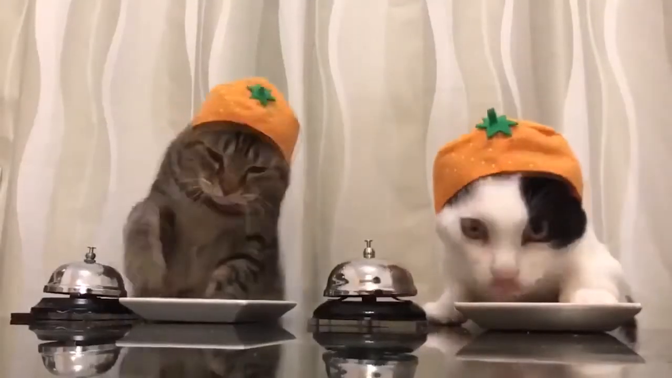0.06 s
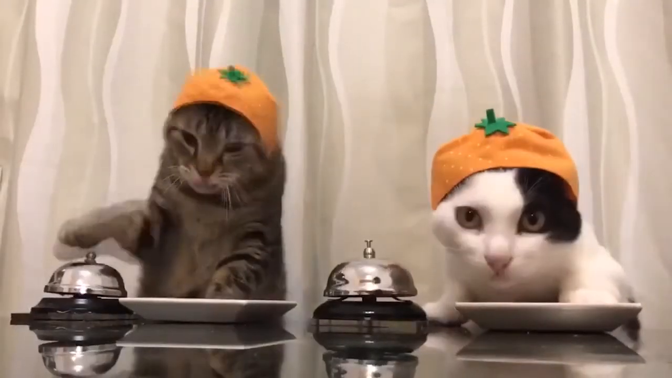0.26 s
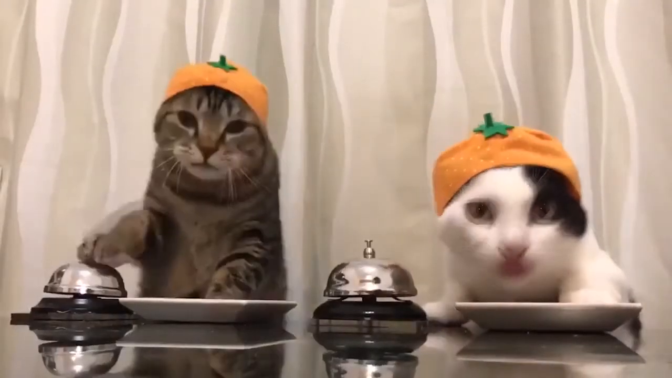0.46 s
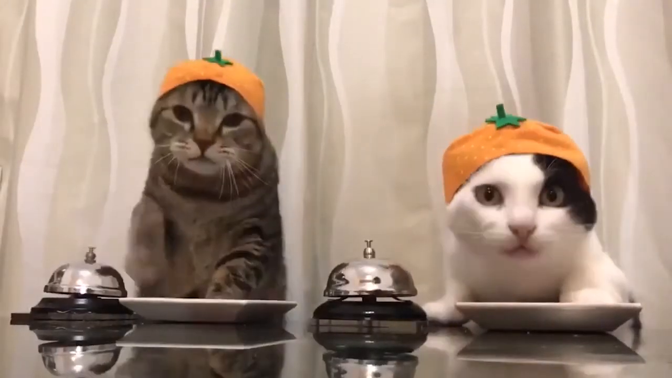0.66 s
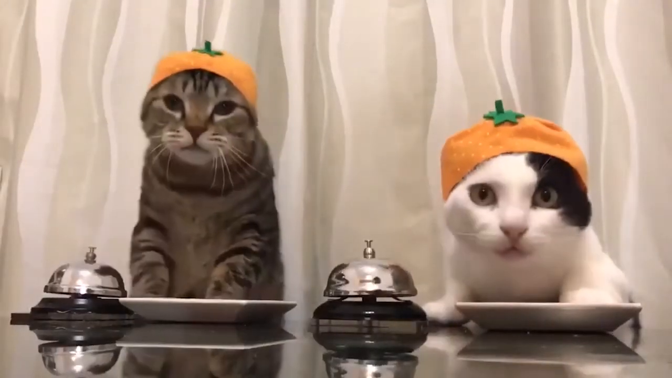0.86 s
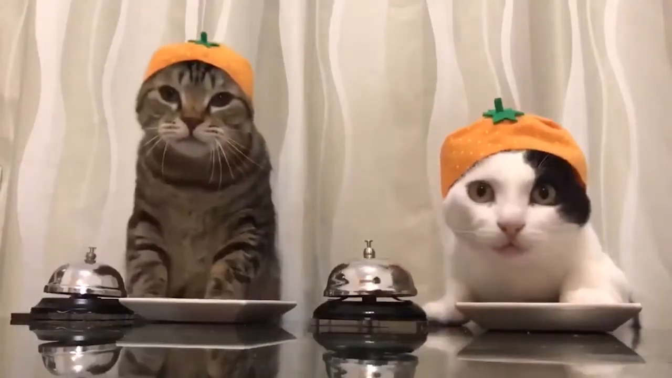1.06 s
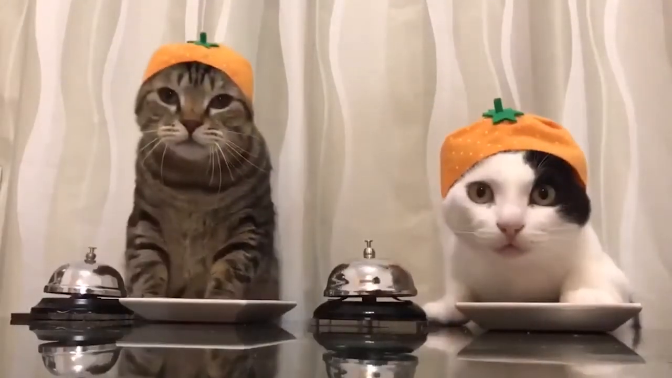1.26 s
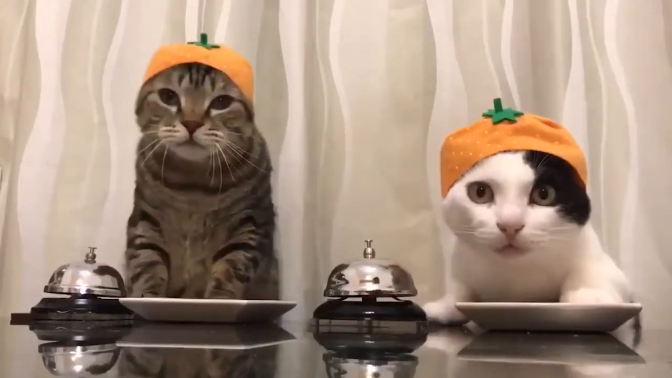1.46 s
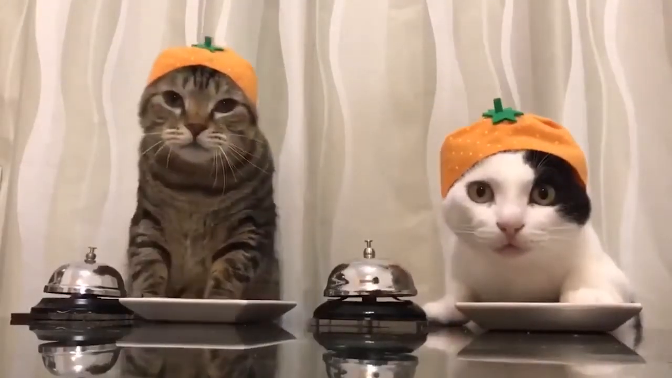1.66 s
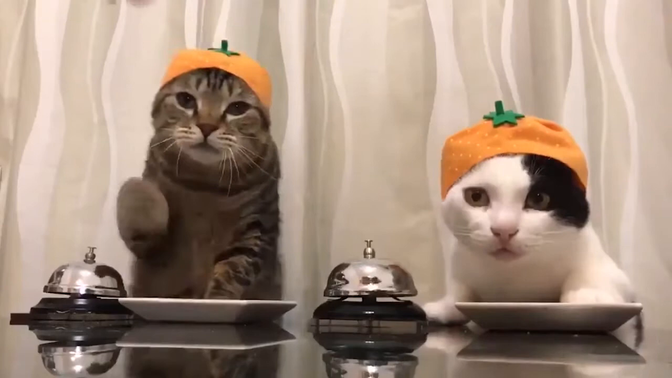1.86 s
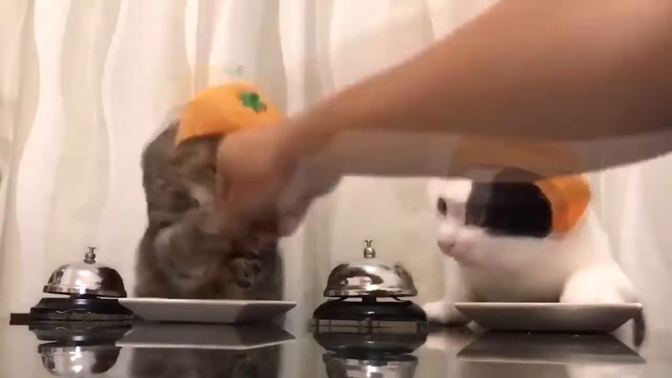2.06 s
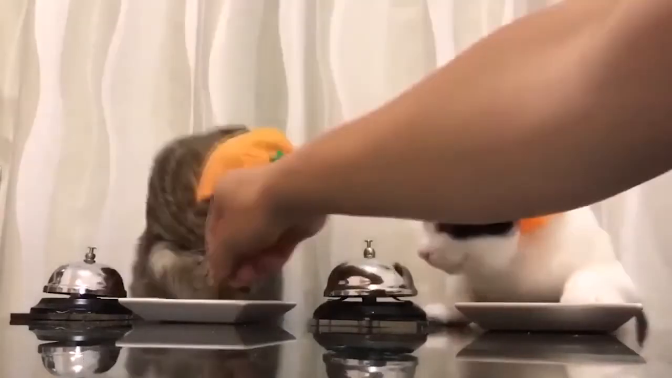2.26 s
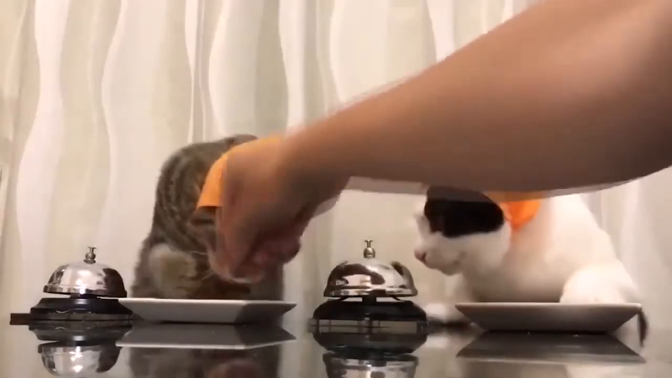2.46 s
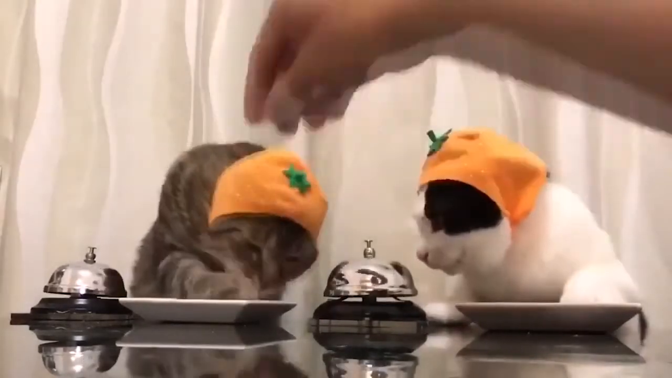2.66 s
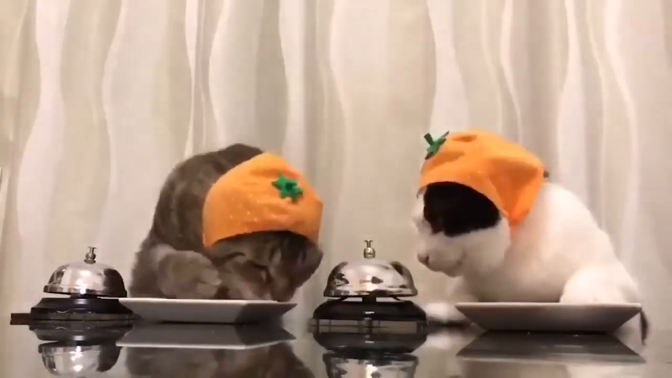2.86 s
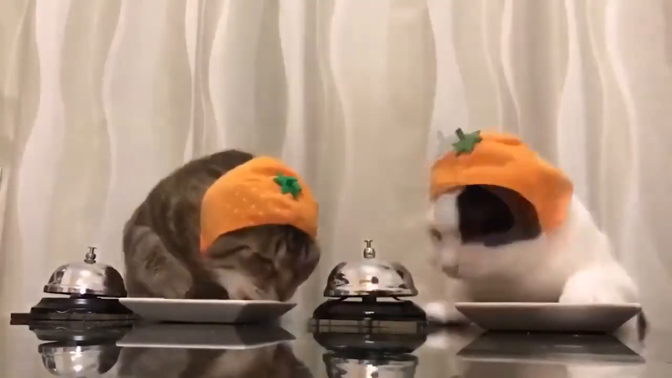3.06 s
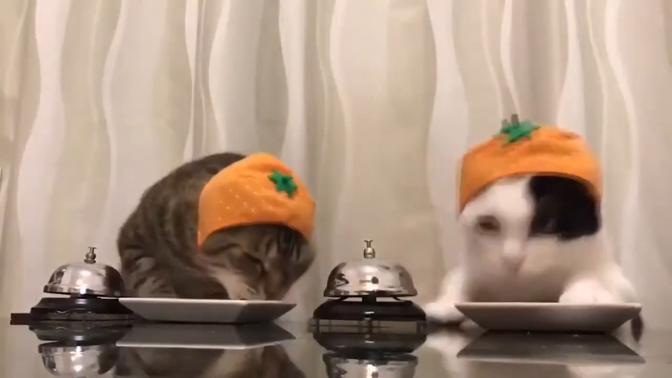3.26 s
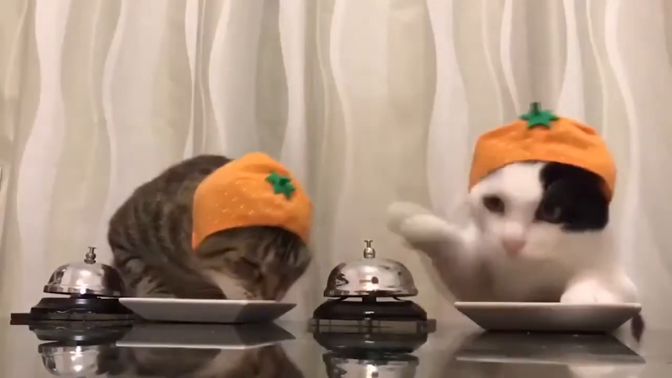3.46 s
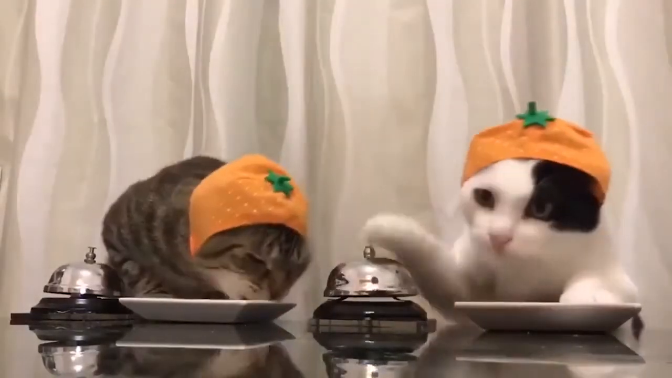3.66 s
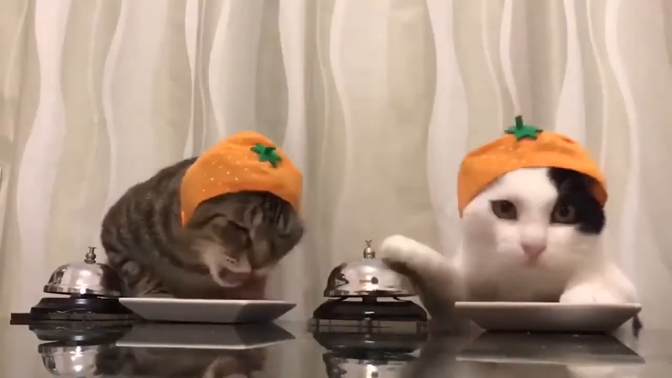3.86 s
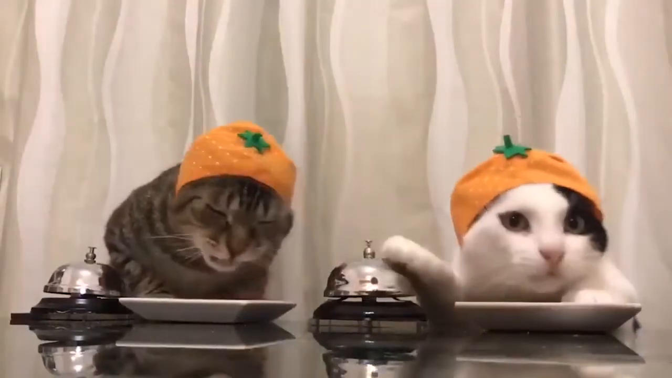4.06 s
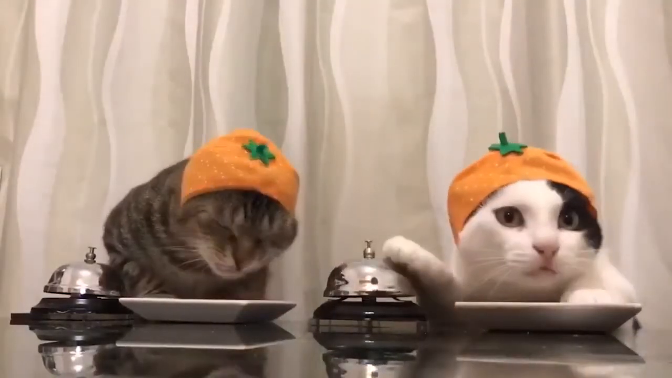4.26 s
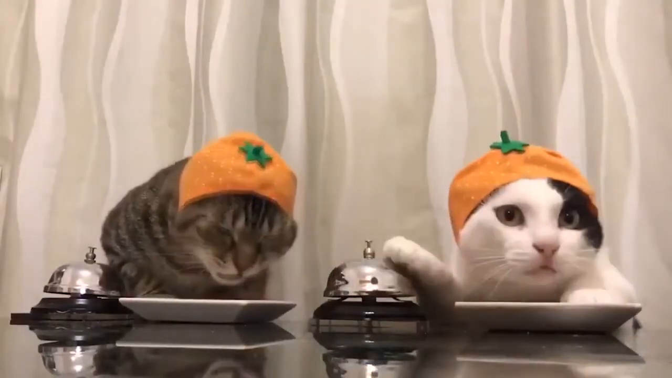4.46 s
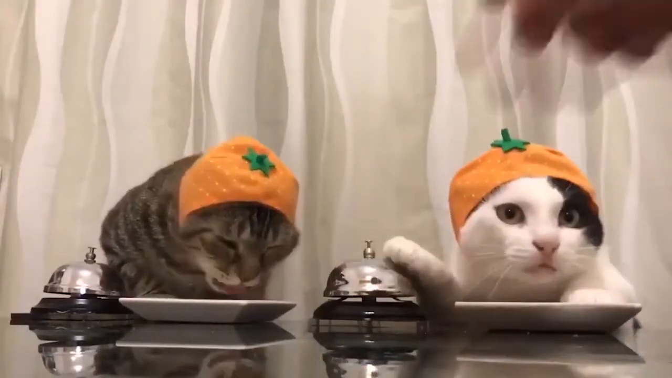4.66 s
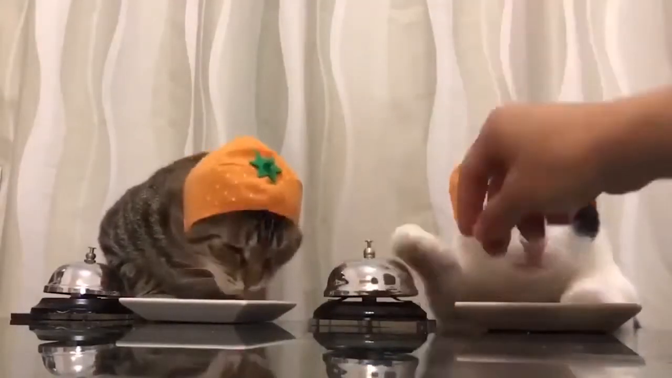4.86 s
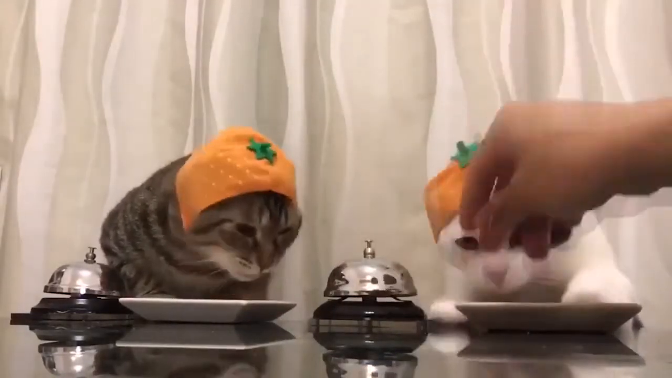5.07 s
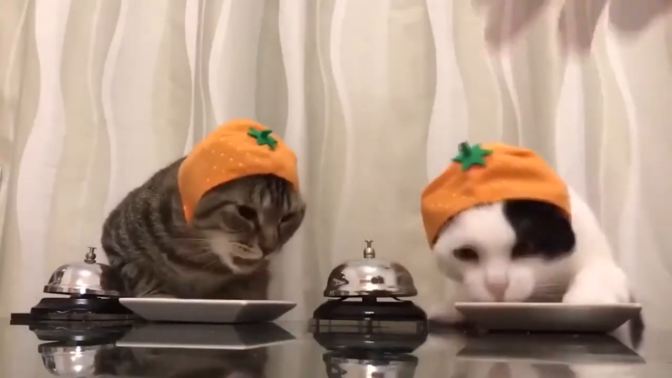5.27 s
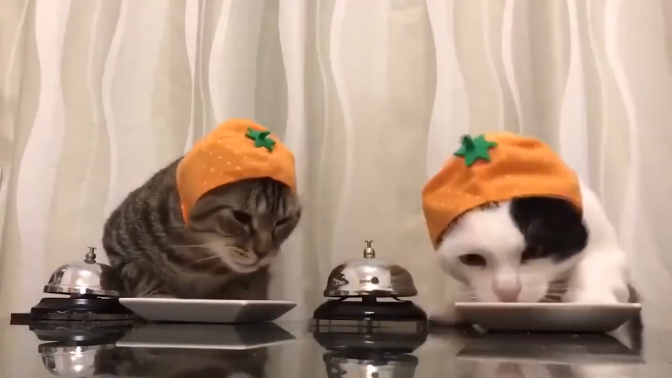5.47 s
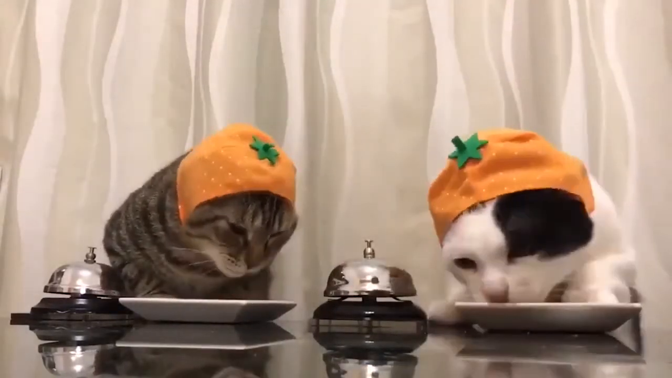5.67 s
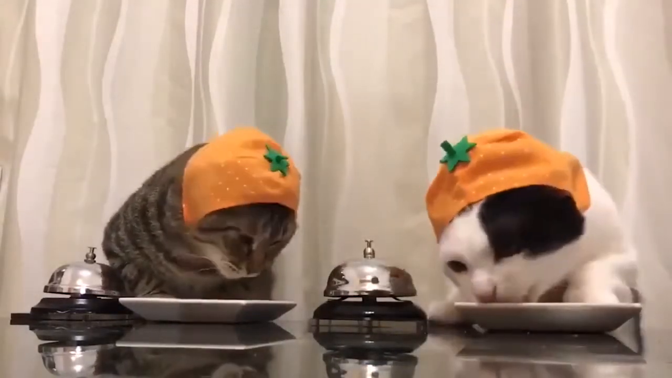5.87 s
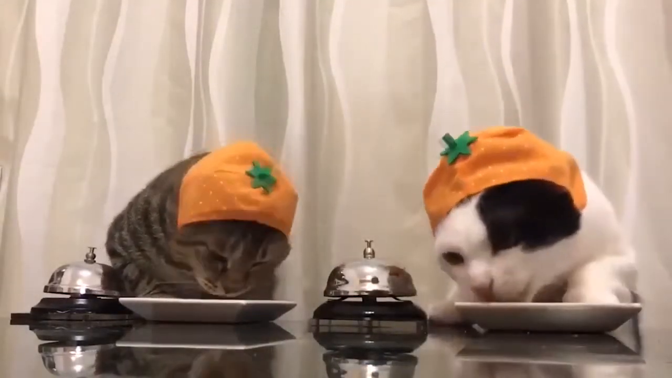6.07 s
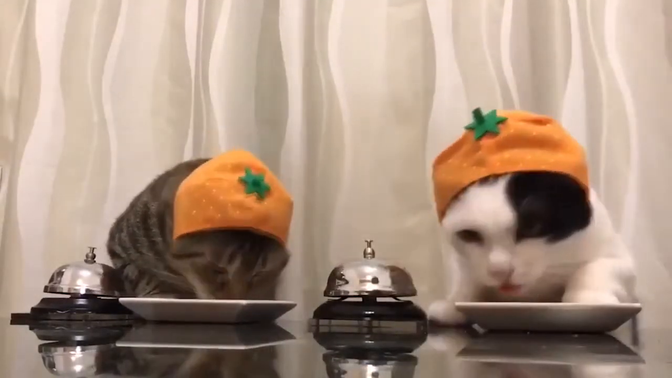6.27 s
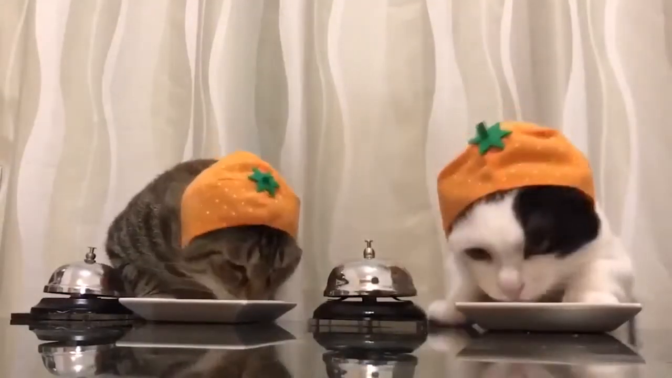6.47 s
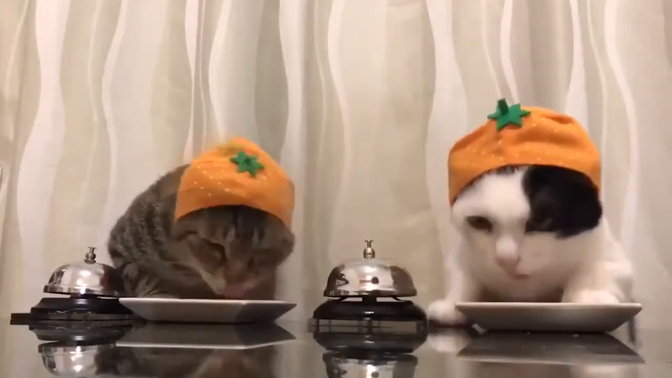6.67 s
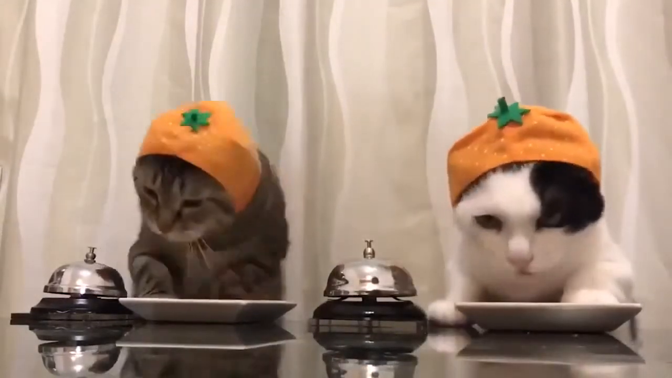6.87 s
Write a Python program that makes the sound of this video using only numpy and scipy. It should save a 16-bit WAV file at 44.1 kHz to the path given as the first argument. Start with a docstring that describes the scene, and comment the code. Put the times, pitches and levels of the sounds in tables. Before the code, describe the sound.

In a quiet room, a cat's paw rattles the plunger of a metal desk bell, then strikes a bright ding that rings on for seconds. Dry food ticks onto a plate between small wet smacks. A second cat hits another bell, which clinks, chatters and rings, then fades under soft chewing and a few more ticks. Everything is heard on the right side, over faint hiss.

```python
"""Two cats ring two steel desk bells on a glass table in a quiet living room and eat dry food from plates.
A paw rattles the first plunger; at 0.6 s the clapper bounces on the bell, each contact restarting its
modes at new strengths, and split pairs beat through the long ring. From 2.6 s food ticks on a plate
between wet smacks. Near 3.9 s the second bell clinks, chatters and rings, then fades under the chewing.
It all plays on the right channel; the left is all but silent, with very faint hiss."""
import sys
import numpy as np
from scipy import signal
from scipy.fft import rfft, irfft, next_fast_len
from scipy.io import wavfile

SR = 44100
rng = np.random.default_rng(int(sys.argv[2]) if len(sys.argv) > 2 else 0)


def master_out(mix):
    """Clip the mix to full scale and print it as 16-bit PCM to the path in sys.argv[1]."""
    frames = np.transpose(np.atleast_2d(mix))
    ceiling = np.clip(frames, -1, 1)
    pcm = np.round(ceiling * 32767).astype(np.int16)
    wavfile.write(sys.argv[1], SR, pcm)


N = 305613
T = np.arange(N) / SR


def amp(db):
    """Decibels to amplitude."""
    return 10 ** (np.asarray(db) / 20)


def add(out, s, piece):
    """Mix a short sound in at s seconds."""
    part = out[round(s * SR):round(s * SR) + len(piece)]
    part += piece[:len(part)]


def dull(x, top_hz):
    """Roll off the top with a second-order low-pass."""
    return signal.lfilter(*signal.butter(2, min(top_hz, 18000), fs=SR), x)


def coloured(x, spectrum):
    """EQ through points of (Hz, dB); white noise keeps its loudness."""
    size = next_fast_len(len(x))
    hz = np.maximum(np.arange(size // 2 + 1) * SR / size, 1)
    point_hz, point_db = np.transpose(spectrum)
    gain = amp(np.interp(np.log(hz), np.log(point_hz), point_db))
    return irfft(rfft(x, size) * gain / np.sqrt(np.mean(gain ** 2)), size)[:len(x)]


def resonate(x, hz, width_hz):
    """Two-pole resonance with unity gain at its peak."""
    r = np.exp(-np.pi * width_hz / SR)
    gain = (1 - r * r) / 2
    return signal.lfilter([gain, 0, -gain], [1, -2 * r * np.cos(2 * np.pi * hz / SR), r * r], x + 1e-18)


def steep_band(x, hz, width_hz):
    """The same resonance twice over, for steeper skirts."""
    return resonate(resonate(x, hz, width_hz), hz, width_hz)


def puff(db, t60, rise=0.00025):
    """A burst of white noise that rises quickly and dies away."""
    age = np.arange(SR // 2) / SR
    envelope = amp(db - 60 * age / t60) * (1 - np.exp(-age / rise))
    return envelope * rng.standard_normal(len(age)) + 1e-18


def ping(hz, db, t60):
    """One briefly ringing mode: a decaying sine."""
    age = np.arange(SR // 4) / SR
    return amp(db - 60 * age / t60) * np.sin(2 * np.pi * hz * age)


def hiss_and_wash():
    """Steady room hiss, plus a broad wash of noise around each bell crash."""
    # Each row: frequency in Hz, noise density in dB.
    hiss_colour = [(12, -34.5), (20, -13.5), (65, 3.5), (162, -10), (345, -13), (419, -19), (916, -16.5),
                   (1050, -19.5), (1150, -13.5), (1280, -18.5), (3040, -33), (5320, -34.5), (9830, -40.5),
                   (13700, -41.5), (15800, -50)]
    # Each row: crest time in seconds, lift in dB.
    washes = [(0.641, 13.5), (3.85, 9)]
    rise_s, fall_s = 0.1, 0.18
    wash_db = sum(db * np.exp(np.minimum((T - s) / rise_s, (s - T) / fall_s)) for s, db in washes)
    return amp(-62.5 + wash_db) * coloured(rng.standard_normal(N), hiss_colour)


def low_tone():
    """A faint low tone comes in, sags in level and goes."""
    hz, start_s, length_s, fade_s, sag_db_per_s = 245.4, 4.53, 0.684, 0.066, 17
    age = T - start_s
    fades = np.clip(np.minimum(age, length_s - age) / fade_s, 0, 1)
    return fades * amp(-64 - sag_db_per_s * age) * np.sin(2 * np.pi * hz * T)


def room_tail(x):
    """The room's diffuse reverb: dull, decaying noise after a short pre-delay."""
    t60, predelay_s = 0.4, 0.004
    age = np.arange(SR // 2) / SR
    tail = dull(rng.standard_normal(len(age)), top_hz=4500) * amp(-60 * age / t60) * (age > predelay_s)
    return amp(-11.5) * signal.fftconvolve(x, tail / np.sqrt(np.sum(tail ** 2)))[:N]


def scuffs():
    """Fur or tongue brushes by: a high band of noise with a soft attack."""
    # Each row: start in seconds, level in dB, centre in Hz, width in Hz.
    strokes = [(2.27, -64, 5980, 5010), (3.775, -45, 8900, 3000), (4.99, -54.5, 5820, 6000),
               (5.27, -49, 9500, 2945), (5.501, -48, 6000, 6000), (5.795, -49, 4500, 1503),
               (5.8, -52, 11070, 4970), (6.646, -37.5, 8760, 1236), (6.82, -60, 10000, 6000)]
    out = np.zeros(N)
    for s, db, hz, width in strokes:
        add(out, s, steep_band(puff(db, t60=0.16, rise=0.027), hz, width))
    return out


def mouth_smacks():
    """Licks, crunches and chews: wet clicks through a steep mouth resonance, over a duller cavity."""
    # Each row: start in seconds, click level in dB, mouth resonance in Hz, body level in dB.
    smacks = [(0.2839, -49.5, 1820, -53), (0.2937, -51.5, 1498, -44.5), (0.35, -53, 2210, -70),
              (0.3631, -57.5, 1900, -71), (1.9839, -50.5, 1330, -49.5), (2.826, -37, 1620, -41),
              (3.27, -56.5, 1436, -68), (3.3822, -51.5, 2136, -57.5), (3.6032, -49, 1668, -42.5),
              (4.147, -46.5, 1900, -65), (4.196, -41.5, 2050, -62.5), (4.455, -44, 1930, -64),
              (4.6299, -54, 2070, -78), (4.798, -52, 1310, -74), (4.8883, -54, 2250, -65),
              (4.9926, -48.5, 1585, -40), (5.2056, -47.5, 2084, -51), (5.477, -59, 2370, -54),
              (5.5049, -40, 1710, -44), (6.6912, -48.5, 1740, -47)]
    # Faint chews fall at random in between.
    draws = rng.uniform(low=(4.3, -67.5, 1300), high=(6.1, -57.5, 2100), size=(14, 3))
    chews = [(s, db, hz, db - 9) for s, db, hz in draws]
    out, t60 = np.zeros(N), 0.054
    for s, db, hz, body_db in smacks + chews:
        add(out, s, amp(13) * steep_band(puff(db, t60), hz, width_hz=820))
        add(out, s, amp(13.5) * steep_band(puff(body_db, t60, rise=0.0028), hz=700, width_hz=1000))
    return out


def food_ticks():
    """Dry food hits a plate with a short crack, ringing each mode at a strength of its own."""
    # Each row: start in seconds, ring level in dB, crack level in dB.
    hits = [(2.5974, -41.5, -32.5), (2.6925, -60, -56), (2.7354, -60, -53.5), (2.7691, -50, -51),
            (2.9208, -60.5, -61), (2.9717, -69, -43.5), (3.3109, -77, -57), (3.4053, -56.5, -43.5),
            (3.51, -49.5, -49), (3.522, -50, -42), (3.6264, -52.5, -48), (3.6429, -44, -39.5),
            (3.7969, -52.5, -52.5), (5.214, -78.5, -48.5), (5.2841, -43.5, -39), (5.8162, -68, -52),
            (6.6621, -71, -47), (6.8293, -70, -54)]
    # The plates' modes. Each row: pitch in Hz, level in dB, t60 in seconds.
    first_plate = [(392, -4.5, 0.086), (825, -2.5, 0.033), (3100, -1, 0.055), (4776, 3, 0.042),
                   (7700, -32.5, .05), (7530, -7, 0.058), (10700, -37.5, 0.028)]
    second_plate = [(1374, -10.5, 0.13), (2900, 2.5, 0.12), (4410, 0, 0.033), (6000, -17, 0.054),
                    (7640, -2.5, 0.052), (9000, -23, 0.065), (9300, -8.5, 0.049)]
    second_meal_s, crack_top_hz = 4.9, 7850
    scatter_db = rng.normal(0, 3, (len(hits), len(first_plate)))
    out = np.zeros(N)
    for (s, ring_db, crack_db), offsets_db in zip(hits, scatter_db):
        plate = first_plate if s < second_meal_s else second_plate
        for (hz, mode_db, t60), offset_db in zip(plate, offsets_db):
            add(out, s, ping(hz, ring_db + mode_db + offset_db, t60))
        crack = puff(crack_db, t60=0.034)
        add(out, s, dull(dull(crack, crack_top_hz), crack_top_hz))
    return out


def plunger_rattles():
    """Plunger and spring rattle under the paw, whose weight thumps into the table."""
    # Each row: start in seconds, level in dB, t60 in seconds, low-pass cutoff in Hz.
    rattles = [(0.444, -42, 0.14, 14960), (0.527, -35.5, 0.11, 15200), (0.537, -41, 0.043, 15000),
               (0.608, -35, 0.18, 12000), (0.634, -30.5, 0.22, 2500), (0.822, -34, 0.1, 5000),
               (0.841, -33.5, 0.12, 5200), (0.912, -36.5, .075, 2440), (1.021, -39.5, 0.15, 1800),
               (4.11, -36, 0.1, 5970), (3.846, -44, .05, 12200), (4.435, -45, 0.1, 3940),
               (4.457, -45.5, 0.1, 14000)]
    # Each row: centre in Hz, width in Hz, gain in dB.
    plunger_resonances = [(1424, 280, 0.5), (4100, 150, -4), (4310, 70, 3), (6440, 121, -10),
                          (6792, 510, -8), (8310, 710, -9), (8920, 190, -0.5), (11057, 354, -16),
                          (12200, 122, -11), (12800, 104, -12), (13000, 183, -9.5), (13796, 232, -11.5)]
    # Each row: start in seconds, level in dB.
    paw_thumps = [(0.447, -56), (0.463, -39.5), (0.49, -44), (0.539, -49), (0.633, -46.5), (3.845, -60),
                  (4.111, -54.5)]
    noise, push = np.zeros(N), np.zeros(N)
    pulse = np.hanning(110)   # the weight lands within 2.5 ms
    for s, db, t60, top_hz in rattles:
        add(noise, s, dull(puff(db, t60), top_hz))
        add(push, s, amp(db - 22.5) * pulse)   # every rattle nudges the table
    for s, db in paw_thumps:
        add(push, s, amp(db) * pulse)
    metal = sum(amp(db) * resonate(noise, hz, width) for hz, width, db in plunger_resonances)
    table = (amp(18) * resonate(push, hz=100, width_hz=30)
             + amp(9.5) * resonate(push, hz=210, width_hz=54)
             + amp(7.5) * resonate(push, hz=520.5, width_hz=200))
    return amp(6) * metal + amp(-8) * noise + table


def first_crash():
    """The clapper hits the first bell's steel in bright splashes of noise."""
    # Each row: start in seconds, level in dB, t60 in seconds.
    hits = [(0.627, -30.5, 0.017), (0.631, -13, 0.067), (0.641, -20, 0.18), (0.812, -41, 0.17),
            (0.841, -43, 0.24)]
    # Each row: frequency in Hz, noise density in dB.
    steel_colour = [(180, -70), (300, -40.5), (1350, -22.5), (2560, -34.5), (3020, -15), (4650, -36),
                    (5570, -3.5), (6050, -18), (7500, -26), (8840, -1.5), (9600, -11), (13600, -22),
                    (15500, -37.5)]
    noise = np.zeros(N)
    for s, db, t60 in hits:
        add(noise, s, puff(db, t60))
    return coloured(noise, steel_colour)


def second_crash():
    """The second bell's plunger clinks as the paw lands; the clapper chatters and loose parts clank."""
    # Each row: start in seconds, level in dB, t60 in seconds.
    hits = [(3.864, -24, .06), (3.87, -26.5, .06), (3.882, -26.5, .08), (3.9, -28.5, .09),
            (3.951, -31.5, 0.092), (3.979, -32, 0.083), (4.112, -39.5, .06)]
    # Each row: frequency in Hz, noise density in dB.
    steel_colour = [(300, -9.5), (1500, -8.5), (2400, -15), (3400, 6), (4300, -3), (4800, -20),
                    (6000, -2.5), (7000, -16.5), (9500, -20.5), (11000, -3), (13000, 2.5), (15500, -11.5)]
    # Each row: centre in Hz, width in Hz, gain in dB.
    loose_parts = [(3350, 110, 8.5), (4030, 50, 11), (4310, 60, 16), (4690, 70, 9.5), (7000, 150, 3),
                   (9560, 150, -1.5), (10500, 140, 11)]
    # Each row: pitch in Hz, level in dB, t60 in seconds.
    clink_modes = [(3400, -7, 0.051), (4690, 0.8, .06), (9500, -8, .06)]
    noise, clink = np.zeros(N), np.zeros(N)
    add(clink, 3.846, sum(ping(hz, db - 30, t60) for hz, db, t60 in clink_modes))
    for s, db, t60 in hits:
        add(noise, s, puff(db, t60, rise=0.0021))
    touches_per_s, rub_db = 2500, -7
    touches = (rng.random(N) < touches_per_s / SR) * np.sqrt(SR / touches_per_s)
    chatter = noise * (touches + amp(rub_db))
    clank = sum(amp(db) * resonate(chatter, hz, width) for hz, width, db in loose_parts)
    return clink + amp(-4.5) * coloured(chatter, steel_colour) + clank


def bell_mode(onsets, damping, hz, mode_db, t60):
    """A decaying sine; each onset whose range covers it crossfades to a fresh ring."""
    # Upper twins of split pairs and side modes, in Hz; their share depends on where the rim is met.
    rim_family_hz = [1162.2, 3043.4, 5640, 10600, 13190, 2864.9, 8693.2, 10444.4, 11996.7, 12795.6, 13015.6]
    # Twins that start in opposite phase, in Hz.
    opposed_hz = [5640, 2864.9]
    sign = -1 if hz in opposed_hz else 1
    accent_octaves = 0.36
    out, decay_clock = np.zeros(N), np.cumsum(damping) / SR
    # Each row: start and rise in seconds, bottom and top of the restarted range in Hz, strength in dB,
    # centre of a boosted or muffled band in Hz, its gain in dB, gain of the rim family in dB.
    for s, rise, low_hz, high_hz, db, accent_hz, accent_db, rim_db in onsets:
        if low_hz < hz < high_hz:
            nearness = np.exp(-.5 * (np.log2(hz / accent_hz) / accent_octaves) ** 2)
            level_db = mode_db + db + accent_db * nearness + rim_db * (hz in rim_family_hz)
            start = round(s * SR)
            age = T[start:] - T[start]
            decay_db = 60 * (decay_clock[start:] - decay_clock[start]) / t60
            fresh = sign * amp(level_db - decay_db) * np.sin(2 * np.pi * hz * age)
            fade_out = np.exp(-age / rise)
            out[start:] = fade_out * out[start:] + (1 - fade_out) * fresh
    return out


def first_bell():
    """The first steel dome rings long after the clapper's bounces, its level wavering slowly."""
    # A faint hum still ringing at the start, then the clapper's contacts; rows as in bell_mode.
    onsets = [(0.0, 0.013, 500, 1400, -41, 6500, 0.1, 18),
              (0.631, 0.0002, 500, 17000, -7.5, 6850, 17.5, 8.5),
              (0.643, 0.0025, 500, 17000, -8, 7030, 15, 11),
              (0.812, 0.012, 500, 17000, -0.24, 7000, 0, 0.1)]
    # Mode pitches in Hz.
    pitches = [1123.2, 1162.2, 1710.4, 3020.2, 3043.4, 4886, 5610.4, 5640, 6920, 8785.5, 9510.4, 10600,
               12685.6, 13190, 13410.5]
    # Each row, one per pitch: level in dB, t60 in seconds.
    modes = [(-42.5, 14.54), (-50, 13), (-70.5, 16), (-21, 5.35), (-35, 5.9), (-44.5, 0.55), (-20.5, 2.167),
             (-28.5, 2), (-69.5, 9.8), (-13, 0.58), (-52, 2.1), (-77, 8.4), (-39, .6), (-43, 0.33),
             (-67.5, 1.9)]
    # Each row: time in seconds, gain of the hum modes in dB, gain of the upper modes in dB.
    waver = [(0.8, -0.5, -1.5), (1.3, 2, 0), (1.9, 3, -1.5), (2.2, 4, -2), (2.7, 7.5, -6.5), (3.0, 1, -5),
             (3.7, 5, -0.5), (4.0, -0.5, -5), (4.4, 4, -1.5), (4.9, 5, -1), (5.3, 3.5, -7),
             (5.8, 3.5, -1.5), (6.3, 2.5, -0.5), (6.93, 1, -1)]
    times, hum_db, upper_db = np.transpose(waver)
    out, damping = np.zeros(N), np.ones(N)
    for hz, (db, t60) in zip(pitches, modes):
        waver_db = np.interp(T, times, hum_db if hz < 1500 else upper_db)
        out += amp(waver_db) * bell_mode(onsets, damping, hz, db, t60)
    return out


def second_bell():
    """The second dome is struck under a damping paw and decays more slowly once the paw is gone."""
    # Clapper and paw contacts; rows as in bell_mode.
    contacts = [(3.862, 0.00093, 500, 17000, -1.5, 6500, -17.5, -34),
                (3.88, 0.0056, 500, 17000, 1, 5000, -6, 2.5),
                (3.905, 0.033, 4000, 6200, 0.4, 5200, 0.27, 0.1),
                (3.922, 0.00091, 7000, 17000, -13.5, 8000, 7.5, 7.5),
                (3.952, 0.00049, 7000, 17000, 10, 7600, -30, -17.5),
                (3.9525, 0.0011, 2000, 4000, -17.5, 3000, -2.2, -5),
                (4.11, 0.0034, 500, 4000, 0.7, 2900, -17.5, 11),
                (4.455, 0.013, 500, 1210, -28, 1100, -1, 0.1)]
    # Mode pitches in Hz.
    pitches = [1113.4, 1315, 2863.2, 2864.9, 5215.5, 5209.7, 7641.6, 8096.5, 8693.2, 9115.6, 10444.4,
               11541.8, 11996.7, 12795.6, 13015.6, 15441.8]
    # Each row, one per pitch: level in dB, t60 under the paw in seconds.
    modes = [(-38.5, 3), (-64.5, 2.17), (-30, 2.78), (-42.5, 2.6), (-21, 1.967), (-23.5, 1.76), (-42, .89),
             (-14.5, 0.98), (-55, 1.5), (-41.5, 1.73), (-42.5, 1.9), (-25, 0.49), (-43.5, .9), (-43, 1.3),
             (-58.5, 1.26), (-49, 0.4)]
    # Lightly damped modes that linger, held steady after the blow. Each row: pitch in Hz, level in dB.
    lingering_modes = [(8705, -90.5), (10444, -98), (12796, -92.5)]
    paw_off_s, release_s, free_damping = 5.55, 0.1, 0.44
    damping = free_damping + (1 - free_damping) / (1 + np.exp((T - paw_off_s) / release_s))
    ring = sum(bell_mode(contacts, damping, hz, db, t60) for hz, (db, t60) in zip(pitches, modes))
    struck = np.clip((T - contacts[0][0]) / 0.098, 0, 1)
    linger = struck * sum(amp(db) * np.sin(2 * np.pi * hz * T) for hz, db in lingering_modes)
    # It still hums from an earlier blow, until the first bell is struck.
    hum = amp(-67.5 - 4 * T) * np.sin(2 * np.pi * pitches[0] * T) * (T < 0.631)
    return hum + ring + linger


def scene():
    """Hiss on the left, the whole mix on the right; only the short sounds feed the reverb."""
    foley = first_crash() + second_crash() + plunger_rattles() + food_ticks() + mouth_smacks() + scuffs()
    faint_left_hiss = amp(-105) * rng.standard_normal(N)
    mix = foley + room_tail(foley) + hiss_and_wash() + low_tone() + first_bell() + second_bell()
    return np.array([faint_left_hiss, 2 * mix])


def record(dry):
    """Peaks clip near full scale, then a steep low-pass cuts the very top."""
    cutoff_hz = 15900
    low_pass = signal.ellip(10, .5, 80, cutoff_hz, fs=SR, output="sos")
    return signal.sosfilt(low_pass, np.clip(dry, -.93, .93))


dry = scene()
out = record(dry)
master_out(out)
```